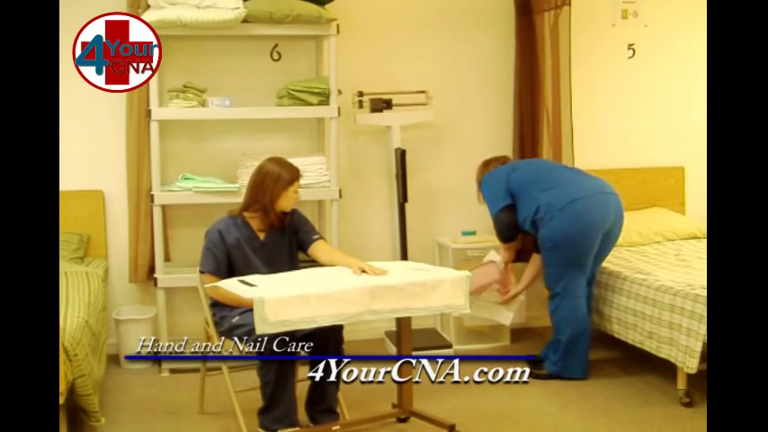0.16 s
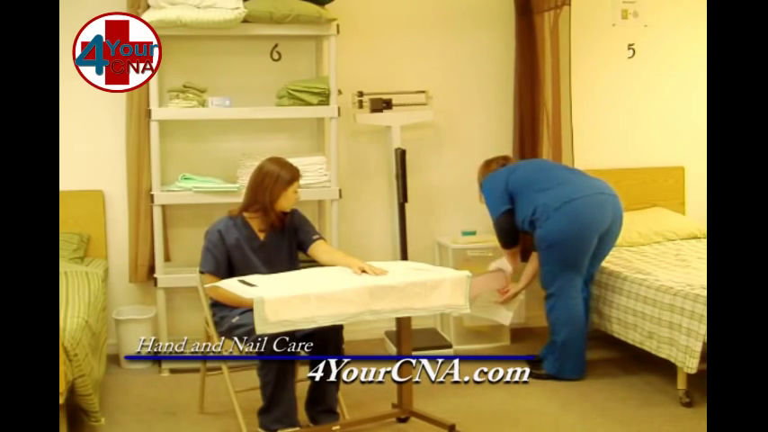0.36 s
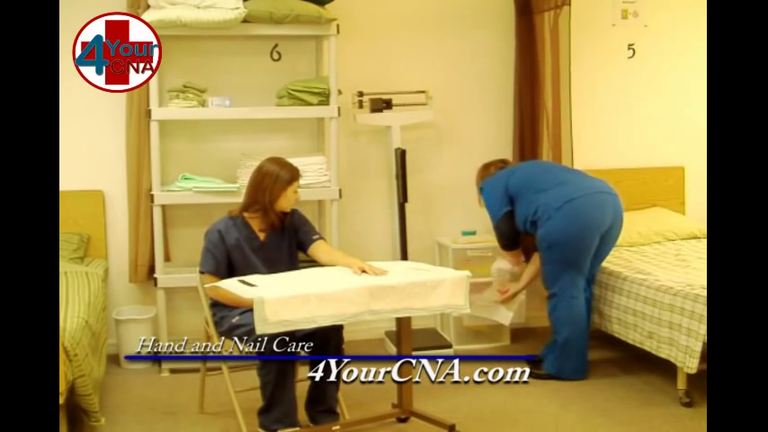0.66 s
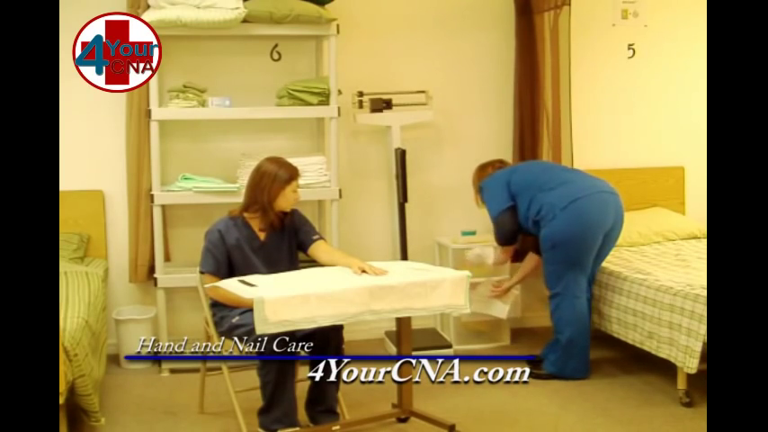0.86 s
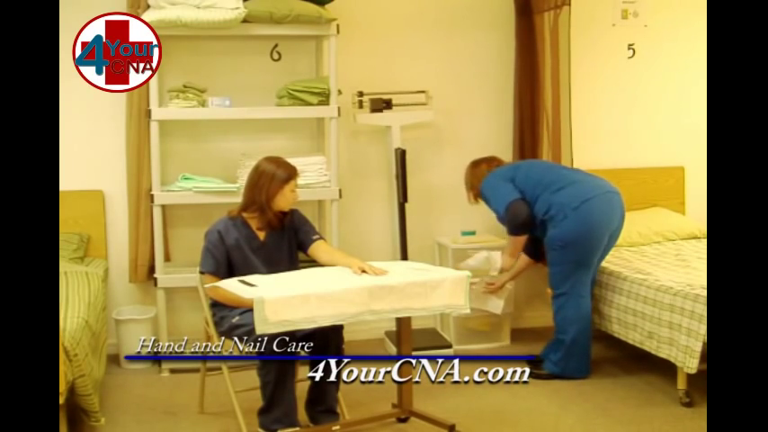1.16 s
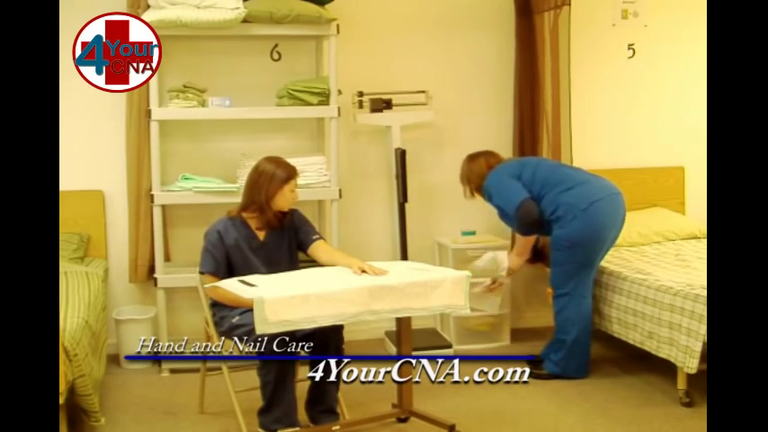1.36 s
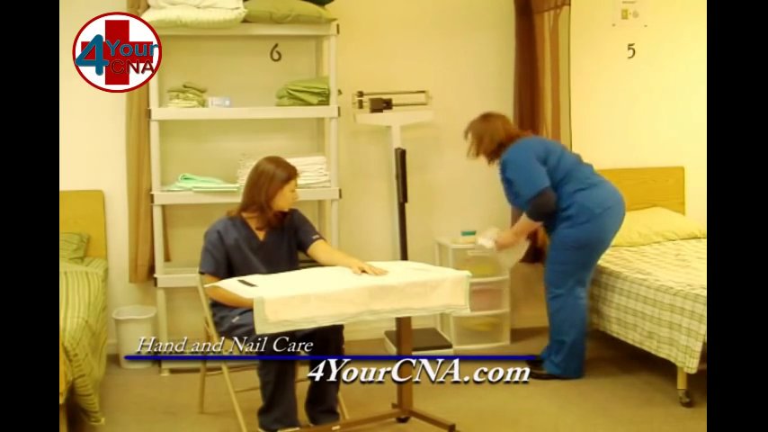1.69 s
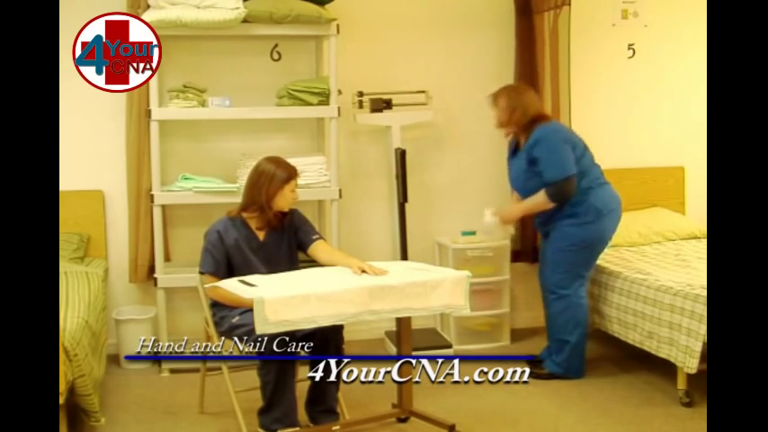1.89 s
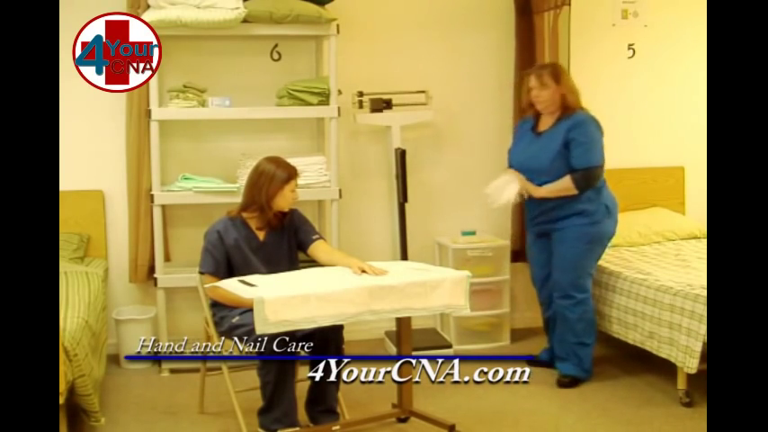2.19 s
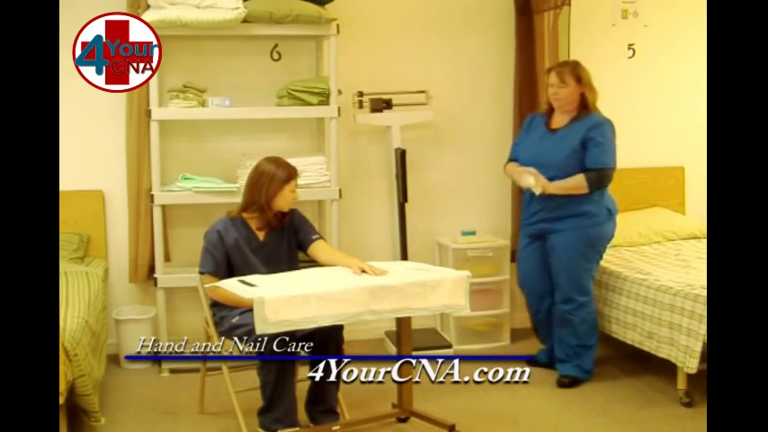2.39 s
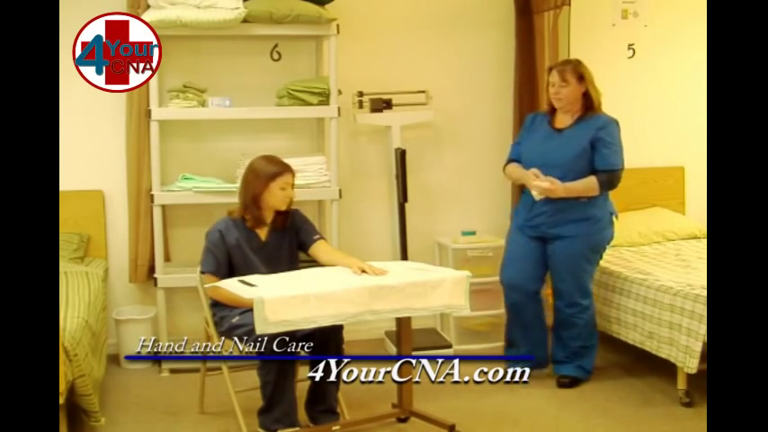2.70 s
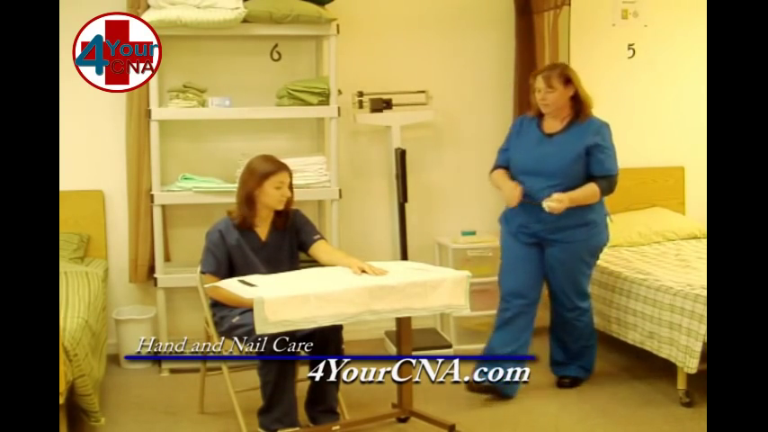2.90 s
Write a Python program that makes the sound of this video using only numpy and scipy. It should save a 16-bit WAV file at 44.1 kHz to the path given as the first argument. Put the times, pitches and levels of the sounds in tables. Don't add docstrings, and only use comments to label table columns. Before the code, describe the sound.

Hollow plastic clunks and clacking bottles as a drawer shuts, followed by close paper towel rustling.

```python
import sys
import numpy as np
from scipy import signal
from scipy.fft import rfft, irfft, next_fast_len
from scipy.io import wavfile
from scipy.ndimage import uniform_filter1d, map_coordinates

SR = 44100
rng = np.random.default_rng(int(sys.argv[2]) if len(sys.argv) > 2 else 0)


def magnitude_from_level(level_db):
    exponent = np.asarray(level_db, float) / 20
    return 10 ** exponent


def wav_record(signal):
    frames = np.transpose(np.atleast_2d(signal))
    bounded = np.clip(frames, -1, 1)
    quanta = np.round(bounded * 32767).astype(np.int16)
    wavfile.write(sys.argv[1], SR, quanta)


N = 134505

# start in seconds, peak level in dB.
SHARP_CONTACTS = [
    (0.7408, -15),
    (0.9035, -7),
    (2.4215, -20),
    (2.4995, -21),
]


def unit(x):
    return x / np.sqrt(np.mean(x ** 2) + 1e-20)


def along(points, hz):
    f, v = np.transpose(points)
    return np.interp(np.log(hz + 1), np.log(f + 1), v)


def envelope(rows):
    s, db = np.transpose(rows)
    return magnitude_from_level(np.interp(np.arange(N) / SR, s, db, left=-120, right=-120))


def wobble(rate):
    knots = rng.standard_normal(int(N * rate / SR) + 4)
    return map_coordinates(knots, [np.arange(N) * rate / SR])


def filtered(x, response):
    m = next_fast_len(len(x) + 4096)
    return irfft(rfft(x, m) * response(np.fft.rfftfreq(m, 1 / SR)), m)[:len(x)]


def coloured(x, spectrum, dull_db=0):
    def response(hz):
        octaves = np.log2(np.clip(hz, 500, 4500) / 3000)
        return magnitude_from_level(along(spectrum, hz) - dull_db * octaves)
    return unit(filtered(x, response))


def grains(per_s, spread_db, clump_db):
    on = rng.random(N) < per_s / SR
    sign = rng.choice([-1, 1], N)
    size_db = spread_db * rng.exponential(size=N).clip(0, 4)
    return unit(on * sign * magnitude_from_level(size_db + clump_db * wobble(60)))


def patchy(x, patchy_db):
    z = signal.stft(x, nperseg=256)[2]
    field = uniform_filter1d(rng.standard_normal(z.shape), size=4, axis=0)
    field = uniform_filter1d(field, size=5, axis=1)
    return signal.istft(z * magnitude_from_level(patchy_db * unit(field)), nperseg=256)[1][:N]


def add(track, s, sound):
    at = round(s * SR)
    track[at:at + len(sound)] += sound[:len(track) - at]


def ring(modes, t, push_s, rough):
    out = 0
    for hz, db, t60 in modes:
        size, phase = (np.interp(t * 70, np.arange(40), knots) for knots in rng.standard_normal((2, 40)))
        decay_db = -60 * np.clip(t - push_s, 0, 1) / t60 - 130 * np.minimum(t, push_s)
        tone = np.sin(2 * np.pi * (hz * t + rng.random()) + rough * phase)
        out = out + magnitude_from_level(db + decay_db + 2 * size) * tone
    return out * (1 - np.exp(-t / 0.00053))


def knocks():
    # start in seconds, levels of basin, drawer bottom and drawer walls in dB, push in seconds.
    pushes = [(0.0, -39, -36, -42, 0.01), (0.157, -39, -51, -44.5, 0.05), (0.276, -46.5, -51, -41, 0.071),
              (0.328, -41, -39.5, -36, 0.02), (0.421, -53, -51, -41, 0.06), (0.463, -31, -46, -38, 0.061),
              (0.652, -43.5, -54, -60, 0.11), (0.738, -30, -30, -20, 0.062), (0.804, -38, -31, -43, 0.028),
              (0.84, -33, -41, -25, 0.057), (0.915, -38, -38, -31, 0.051), (0.967, -37, -28.5, -28, 0.034),
              (1.044, -39, -35.5, -34, 0.045), (1.069, -40.5, -39.5, -50, 0.037),
              (1.217, -45, -48, -41, 0.1), (1.264, -27.5, -27.5, -27.5, 0.04),
              (1.469, -57, -33.5, -24.5, 0.066), (1.509, -38.5, -33.5, -49, 0.032),
              (1.556, -37, -31, -49, 0.029), (1.594, -55, -34.5, -28.5, 0.011)]
    # frequency in Hz, level in dB, t60 in seconds.
    basin = [(340.7, 6, 0.047), (886, -8.5, 0.053)]
    bottom = [(93, -6, 0.103), (150.4, -3.5, 0.053), (222.5, 0.5, 0.027), (255, -2.5, 0.045),
              (432, -3, 0.068)]
    walls = [(566.7, -1, 0.27), (657, -9, 0.41), (779, -6, 0.055), (980, -34, 0.028), (1350, -8.5, 0.25),
             (1730, -22, 0.072)]
    # start in seconds, level in dB, frequency in Hz, t60 in seconds.
    shut = (1.58, -37.5, 85, 1.0)
    out, t = np.zeros(N), np.arange(SR // 5) / SR
    for s, basin_db, bottom_db, walls_db, push_s in pushes:
        knock = magnitude_from_level(basin_db - 4) * ring(basin, t, push_s, rough=0.055)
        knock += magnitude_from_level(bottom_db - 4) * ring(bottom, t, push_s, rough=0.97)
        knock += magnitude_from_level(walls_db - 9) * ring(walls, t, push_s, rough=0.95)
        add(out, s, knock)
    s, db, boom_hz, t60 = shut
    add(out, s, magnitude_from_level(db) * ring([(boom_hz, 0, t60)], np.arange(SR // 2) / SR, 0.03, rough=0.05))
    return filtered(out, lambda hz: hz ** 4 / (hz ** 4 + 65 ** 4))


def pings(rows):
    out, t = np.zeros(N), np.arange(SR // 8) / SR
    for s, hz, db, swell_s in rows:
        u = t / swell_s
        add(out, s, magnitude_from_level(db) * u * np.exp(1 - u) * np.sin(2 * np.pi * hz * t))
    return out


def thuds():
    # start in seconds, frequency in Hz, peak level in dB, swell in seconds.
    favoured = [(.158, 337, -36.5, 0.015), (.327, 340.5, -33.5, 0.013), (.46, 366, -28, 0.0046),
                (.473, 326, -28.5, .012), (.463, 883, -36, 0.01), (.49, 780, -40, 0.017),
                (.295, 180, -40, 0.0057), (1.935, 344, -43.5, 0.014), (2.716, 620, -38, 0.0032),
                (.741, 569.5, -23, 0.012), (.743, 229, -18.5, 0.0025), (.757, 275, -23, 0.0078),
                (.78, 505, -25, 0.0044), (.803, 908, -25.5, 0.0032), (.83, 194, -27.5, 0.0042),
                (.865, 552, -36.5, 0.016), (.903, 228, -27.5, 0.011), (.957, 557, -28.5, 0.007),
                (1.228, 385, -44, 0.0053), (1.262, 428, -22, 0.0079), (1.267, 223, -23.5, 0.0062),
                (1.27, 582, -21.5, 0.004), (1.279, 320.6, -17.5, 0.005), (1.3, 469, -33, 0.0056),
                (1.318, 192, -33, 0.0074), (1.385, 601, -27, 0.0086), (1.42, 606, -32.5, 0.0055),
                (1.555, 220, -25.5, .009), (1.59, 225, -27, 0.0064)]
    return pings(favoured)


def cracks(rows, spectrum, gain_db, tick, peak_db):
    out, t = np.zeros(N), np.arange(SR // 6) / SR
    for s, db, dull_db, t60, peak_hz in rows:
        def resonance(hz):
            return 1 + magnitude_from_level(peak_db) / (1 + ((hz - peak_hz) / (0.066 * peak_hz)) ** 2)
        noise = filtered(rng.standard_normal(len(t)), resonance)
        flutter = np.interp(t * 300, np.arange(60), rng.standard_normal(60))
        noise = coloured(noise * magnitude_from_level(3.5 * np.clip(t / 0.012, 0, 1) * flutter), spectrum, dull_db)
        decay = magnitude_from_level(-60 * t / t60) + tick * magnitude_from_level(-60 * t / 0.002)
        add(out, s, magnitude_from_level(db + gain_db) * noise * decay * (1 - np.exp(-t / 0.00051)))
    return out


def clacks():
    # start in seconds, peak level in dB, dullness in dB per octave, t60 in seconds, resonance in Hz.
    hits = [(0.4164, -29, 4, 0.22, 1350), (0.462, -25.5, 6, 0.3, 1300), (0.5944, -24, 0, 0.1, 4440),
            (0.6666, -16.5, -1, 0.04, 3920), (0.7402, -14.5, 2, 0.23, 1750),
            (0.8086, -18.5, 9.5, 0.15, 900), (0.8252, -18.5, 0.5, 0.13, 1630),
            (0.8626, -21, 1.5, 0.13, 1710), (0.882, -21, -2, 0.13, 4340), (0.9018, -17, 0, 0.28, 4470),
            (0.9612, -16.5, -1.5, 0.27, 2210), (0.9958, -32.5, -9, 0.3, 4200), (1.05, -20, 0, 0.11, 3000),
            (1.0699, -23, 2, 0.25, 1540), (1.2319, -21.5, 4.5, 0.21, 1440), (1.263, -18.5, 0.5, 0.11, 3550),
            (1.3676, -20.5, 5, 0.069, 1130), (1.3932, -16.5, 2, 0.14, 3400),
            (1.4314, -22, -16, 0.086, 3270), (1.4665, -15.5, -0.5, 0.1, 4500), (1.5092, -23, 6, 0.17, 910),
            (1.558, -18.5, 4, 0.12, 2670)]
    # frequency in Hz, density in dB per Hz.
    plastic = [(100, -28), (400, -2), (700, -2), (1500, -1), (4600, -0.5), (6500, -13), (9000, -23),
               (14000, -23)]
    return cracks(hits, plastic, gain_db=-8, tick=0.44, peak_db=-4)


def ticks():
    out, t = np.zeros(N), np.arange(200) / SR
    for s, db in SHARP_CONTACTS:
        decay = magnitude_from_level(db + 4 - 60 * t / 0.0018)
        add(out, s, decay * np.sin(2 * np.pi * 4600 * t) * np.clip(t / 0.0001, 0, 1))
    return out


def rattle():
    # start in seconds, frequency in Hz, peak level in dB, swell in seconds.
    caps = [(.562, 4700, -47, .002), (.666, 4030, -29, .002), (.9052, 4200, -11, 0.00031),
            (.9068, 4500, -19, .0012), (.9175, 5360, -26, 0.00082), (.9615, 1670, -24, .0012),
            (.9655, 2120, -25.5, 0.0014), (.746, 4310, -27.5, 0.0019), (.758, 4090, -24, 0.0017),
            (.995, 4740, -27, 0.00068), (1.367, 3360, -30, 0.00086), (1.369, 1170, -32.5, 0.0022),
            (1.394, 3300, -24, 0.0011), (1.409, 3540, -32, 0.0012), (1.415, 3470, -24, .002),
            (1.433, 3200, -24, 0.0011), (1.47, 3180, -21, 0.0013)]
    return pings(caps)


def slide():
    # time in seconds, level in dB.
    pressure = [(1.36, -75), (1.375, -37.5), (1.4, -36.5), (1.445, -31), (1.46, -36), (1.48, -32),
                (1.59, -36.5), (1.64, -53)]
    # centre in Hz, width in Hz, level in dB.
    resonances = [(245, 30, -3.5), (574, 31, 2), (1300, 180, -25)]
    # frequency in Hz, density in dB per Hz.
    hiss = [(60, -42), (120, -12), (500, -1), (1460, -8), (4900, -7.5), (7000, -23), (14000, -35)]

    def shell(f):
        total = 0
        for k, (centre, width, db) in enumerate(resonances):
            damping = 1j * f * width
            total = total + (-1) ** k * magnitude_from_level(db) * damping / (centre ** 2 - f ** 2 + damping)
        return total

    slips = grains(per_s=710, spread_db=4, clump_db=-5.5) + 1.5 * rng.standard_normal(N)
    return envelope(pressure) * (magnitude_from_level(3) * coloured(slips, hiss) + magnitude_from_level(-2) * unit(filtered(slips, shell)))


def towel():
    # start in seconds, length in seconds, level in dB, swell in dB,
    # dullness from 0 to 1.
    strokes = [(-.02, 0.086, -37, -10.5, 0.84), (0.042, 0.15, -41.5, 5, 0.26), (0.207, 0.13, -42, 6, 0.52),
               (0.348, 0.041, -46, 1.5, 0.65), (0.393, 0.089, -42.5, 5.5, 0.5),
               (0.492, 0.026, -54, 10, 0.2), (0.546, 0.26, -35.5, 2, 0.41), (1.096, 0.19, -48, 6.5, 0.78),
               (1.25, 0.11, -40, -2, 0.86), (1.755, 0.088, -54, 1.5, 0.1), (1.861, 0.09, -37, 8.5, 0.71),
               (1.969, 0.071, -44.5, 7, 0.5), (2.041, 0.088, -34.5, -1.5, 0.52),
               (2.153, 0.12, -48.5, -4, 0.8), (2.199, 0.232, -41, 2, 0.49), (2.415, 0.13, -35.5, 3.5, 0.54),
               (2.556, 0.085, -35, 1.5, 0.52), (2.656, 0.059, -45.5, 6.5, 0.66),
               (2.714, 0.092, -36.5, 0.5, 0.51), (2.823, 0.21, -40, -1.5, 0.48)]
    # frequency in Hz, density in dB per Hz.
    paper = [(150, -26), (500, -7.5), (1800, -0.5), (3100, 1.5), (4900, 0), (6500, -12), (9500, -18),
             (14000, -34.5)]
    # start in seconds, peak level in dB.
    snaps = [
        (1.912, -11),
        (2.1002, -18),
        (2.4193, -10),
        (2.464, -11.5),
        (2.4972, -10.5),
        (2.575, -16),
        (2.7194, -21),
    ]
    attack_s, release_s = 0.012, 0.026
    t = np.arange(N) / SR
    rub = rng.standard_normal(N) * magnitude_from_level(0.17 * wobble(140))
    fibres = patchy(rub + magnitude_from_level(-10) * grains(per_s=4100, spread_db=5, clump_db=5.5), patchy_db=1.3)
    thin, full = coloured(fibres, paper, dull_db=-13.5), coloured(fibres, paper, dull_db=2)
    out = np.zeros(N)
    for s, length, db, swell_db, dull in strokes:
        rise = np.clip((t - s) / attack_s, 0, 1)
        fall = np.exp(-np.clip(t - s - length, 0, 1) / release_s)
        level = magnitude_from_level(db + swell_db * np.clip((t - s) / length, 0, 1))
        out += level * rise * fall * ((1 - dull) * thin + dull * full)
    out = out * magnitude_from_level(0.6 * wobble(30).clip(-1.5, 1.5))
    creases = [(s, db, 1, 0.025, 3000) for s, db in snaps]
    return out + cracks(creases, paper, gain_db=-12.5, tick=0.6, peak_db=4)


def room(x):
    # frequency in Hz, t60 in seconds.
    reverberation = [(150, 0.43), (3000, 0.19), (12000, 0.54)]
    out, step = np.zeros(N), SR // 5
    for at in range(0, N, step):
        hz, t, z = signal.stft(rng.standard_normal(SR // 2), SR, nperseg=256)
        decay = magnitude_from_level(-60 * t / along(reverberation, hz)[:, None])
        tail = signal.istft(z * decay, SR, nperseg=256)[1]
        echo = signal.fftconvolve(x[at:at + step], tail / np.linalg.norm(tail))
        add(out, at / SR + 0.004, echo)
    return out


def air():
    # frequency in Hz, density in dB per Hz.
    background = [(15, -18), (40, -7.5), (87, -5), (220, -13.5), (400, -19), (4000, -19.5), (6500, -29.5),
                  (15000, -30.5)]
    # frequency in Hz, level in dB.
    tones = [(85, -76), (118, -55.5)]
    t = np.arange(N) / SR
    hum = 0
    for hz, db in tones:
        hum = hum + magnitude_from_level(db + 1.3 * wobble(6.2)) * np.sin(2 * np.pi * hz * t + 2 * wobble(16))
    level = magnitude_from_level(-50 + 0.21 * wobble(4.4).clip(-1, 1))
    return level * coloured(rng.standard_normal(N), background) + hum


def scene():
    hollow = knocks() + thuds()
    bright = clacks() + ticks() + rattle() + slide() + towel()
    answer = magnitude_from_level(-8.5) * room(bright + magnitude_from_level(-1.5) * hollow)
    return (hollow + bright + answer + air())[None]


def starved(dry, size, spare_db=0):
    # frequency in Hz, level in dB to the moment's mean bin.
    floor = [(5000, -47), (6900, -22), (9900, -20), (10200, -12), (12000, -9), (14500, -7)]
    hz, _, z = signal.stft(dry, SR, nperseg=size, window="cosine")
    power = np.abs(z) ** 2
    weight = 0.7 + 2.5 * (hz < 1000)
    loudness = (power * weight[:, None]).mean(1, keepdims=True)
    kept = power > loudness * magnitude_from_level(2 * along(floor, hz) + 2 * spare_db)[:, None]
    return signal.istft(z * kept, SR, nperseg=size, window="cosine")[1][:, :N]


def roll_off(x):
    return signal.sosfilt(signal.butter(12, 15700, fs=SR, output="sos"), x)


def record(dry):
    t = np.arange(N) / SR
    reach_s = 0.0085
    short = 0
    for s, _ in SHARP_CONTACTS[:2]:
        short = short + np.clip(2 - 2 * np.abs(t - s - 0.003) / reach_s, 0, 1)
    brief = starved(dry, size=256, spare_db=-4.5)
    mix = (1 - short) * starved(dry, size=2048) + short * brief
    return roll_off(mix)


dry = scene()
out = record(dry)
wav_record(out)
```